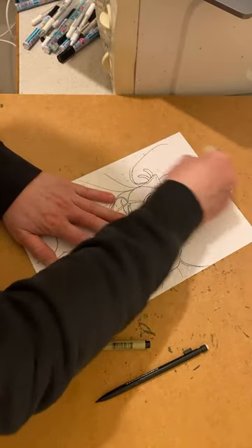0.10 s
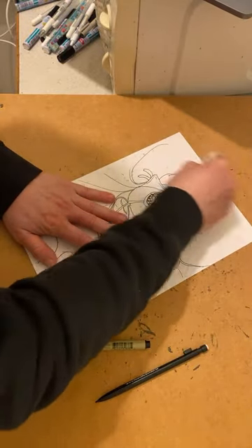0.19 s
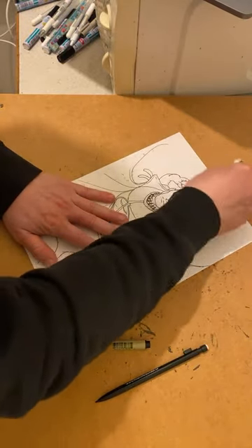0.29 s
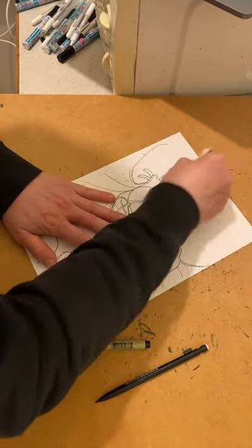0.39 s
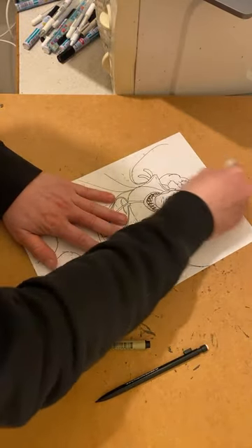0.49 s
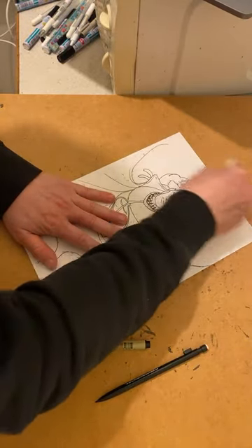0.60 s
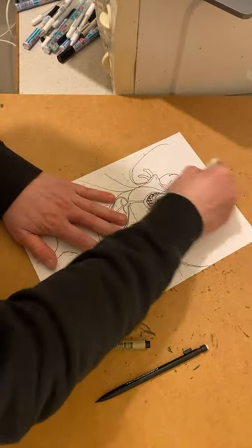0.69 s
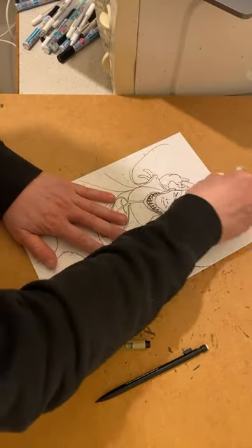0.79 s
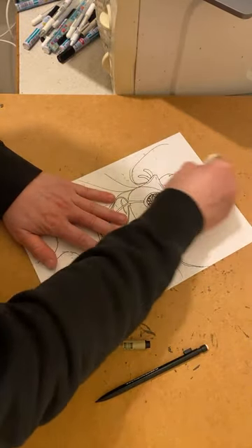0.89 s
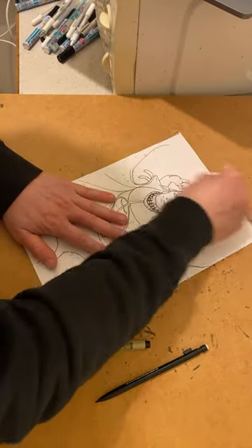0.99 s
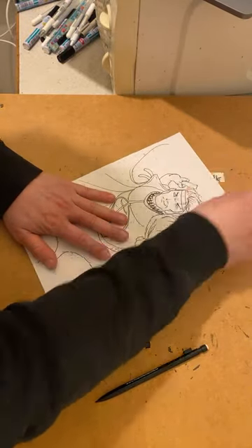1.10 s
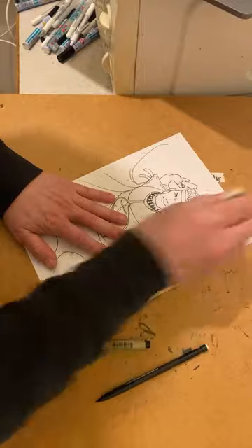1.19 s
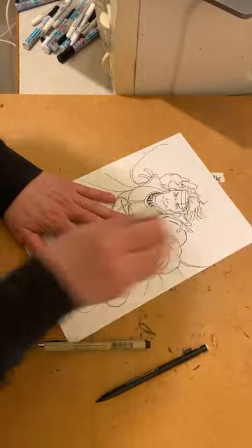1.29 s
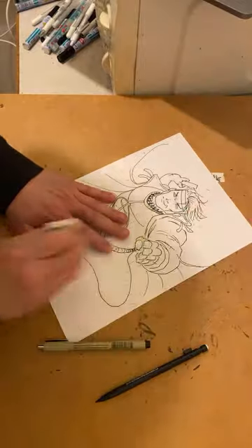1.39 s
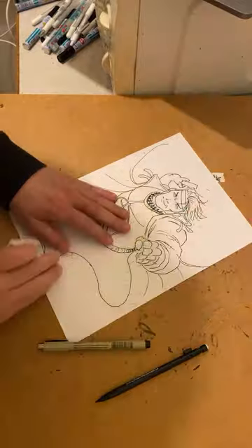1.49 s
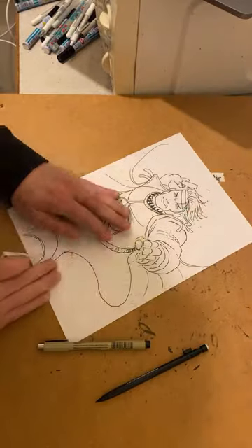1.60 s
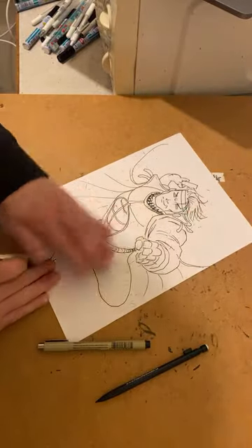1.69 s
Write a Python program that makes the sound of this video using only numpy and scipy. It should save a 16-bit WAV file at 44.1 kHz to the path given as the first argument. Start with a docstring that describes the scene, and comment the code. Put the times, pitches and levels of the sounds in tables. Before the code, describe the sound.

An eraser scrubs paper in quick strokes, each a soft hiss with a hollow knock from the wooden desk. Then a hand swishes across the sheet twice, the second time faintly. It sounds close, in a small, quiet room.

```python
"""Hollow knocks and a soft hiss, about four a second: an eraser scrubs paper on a wooden desk.
Each stroke rocks the desk, which knocks and clacks; the rubber hisses as it slides.
Then a hand sweeps the sheet twice, with a faint squeak of skin, and bumps the desk softly.
The small room echoes and hums quietly. Twice the sound cuts out for an instant."""
import sys
import numpy as np
from scipy import signal
from scipy.fft import rfft, irfft
from scipy.io import wavfile
from scipy.ndimage import uniform_filter1d

SR = 44100
rng = np.random.default_rng(int(sys.argv[2]) if len(sys.argv) > 2 else 0)


def pcm_store(signal):
    """Save signal as 16-bit PCM."""
    levels = np.round(np.clip(np.atleast_2d(signal), -1, 1) * 32767)
    wavfile.write(sys.argv[1], SR, levels.astype(np.int16).T)


N = 74970
TIME = np.arange(N) / SR

# A tone table says how strong low and high pitches are. fade_s is the time to die away by 60 dB.
# tone of the room's quiet air: pitch_hz, level_db
AIR_TONE = [(25, -17), (50, -9), (100, 10), (150, 5), (210, 0.5), (400, 4.5), (700, -9.5), (2000, -17.5),
            (6000, -24), (16000, -32.5)]
# the room's low hum: pitch_hz, level_db
HUM_NOTES = [(48.5, -76.5), (97, -98.5), (148.5, -63.5)]
# tone of a knock's echo: pitch_hz, level_db
KNOCK_ECHO_TONE = [(50, -30), (115, -5), (160, -6.5), (210, -23), (270, 1), (340, 4), (450, 3), (600, -9),
                   (950, -15), (1300, -14), (1650, -18), (2100, -22), (3000, -36), (5000, -43.5),
                   (8000, -70), (16000, -63)]
# how long a knock's echo lasts: pitch_hz, fade_s
KNOCK_ECHO_FADE = [(110, 0.49), (260, 0.33), (430, 0.5), (1000, 0.52), (3000, 0.47), (9000, 0.17)]
# notes that ring between the walls: pitch_hz, level_db, fade_s
ROOM_NOTES = [(119.2, -39.5, 0.63), (332.3, -40.5, 0.47), (433.5, -36, 0.74), (576, -35.5, 0.39),
              (670, -59, 0.2), (711, -53, 0.18), (773.5, -43, 0.49), (890, -41, 0.36), (938, -53.5, 0.23),
              (1076, -41.5, .35)]
# strength of the echo compared with the rubbing itself: pitch_hz, level_db
RUB_ECHO_LEVELS = [(1000, -5.5), (5000, -5), (9000, -6.5), (15000, -14.5)]
# how long the rubbing's echo lasts: pitch_hz, fade_s
RUB_ECHO_FADE = [(1000, 0.72), (5000, .45), (9000, 0.46), (15000, 0.42)]

# the arm leans on the desk: start_s, width_s, level_db
ARM_THUDS = [(0.275, 0.001, -32), (.9895, .002, -27)]
# notes of the hand's soft bump: pitch_hz, level_db, fade_s
BUMP_NOTES = [(110, -11, 0.23), (145.6, 5, 0.34), (172, 1.5, 0.3), (317, -3, 0.2)]
# skin squeaks on paper: start_s, length_s, middle_pitch_hz, glide_hz_per_s, level_db
SKIN_SQUEAKS = [(1.451, .02, 1275, 1203, -55.5), (1.458, 0.058, 760, -700, -63)]
# hand sweeps: fastest_at_s, rise_s, fall_s, level_db, treble_db_per_octave, skin_rub_db
HAND_SWEEPS = [(1.086, 0.026, .022, -43.5, -4, -10), (1.56, 0.081, 0.066, -62, 3, -2.5)]
# tone of the hand's hiss: pitch_hz, level_db
PALM_TONE = [(300, -39), (1200, -13.5), (2000, -22), (3000, -4), (4100, -4), (5200, -0.5), (6500, -2.5),
             (9000, -4.5), (12000, -7), (16000, -10)]
# tone of the skin's dull rub: pitch_hz, level_db
SKIN_TONE = [(200, -29), (450, -26), (780, -1), (1000, -5), (1350, -4.5), (2000, -11), (3500, -13),
             (9000, -27)]

# eraser slides: fastest_at_s, width_s, level_db
ERASER_SLIDES = [(0.018, 0.041, -53.5), (0.285, .04, -53), (0.548, 0.05, -55), (0.804, 0.039, -54)]
# tone of rubber on paper: pitch_hz, level_db
RUBBER_TONE = [(300, -16), (1200, 8.5), (2500, -6), (5000, -5), (7000, -9.5), (9500, -9.5), (12000, -11.5),
               (16000, -16.5)]
# desk knocks: start_s, level_db, treble_db, clack_db, place (0 under the eraser, 1 where the arm pushes)
DESK_KNOCKS = [(-.052, -8, 0, -8, 0.13), (0.1994, -1.5, -2.5, -5.5, 0.38), (0.4664, -0.5, 2, 1.5, 0.069),
               (.7166, -3.5, -0.5, -5.5, 0.046), (0.9902, -3.5, 1, -32, 0.92)]
# notes of the desk top: pitch_hz, level_at_place_0_db, level_at_place_1_db, hold_s, fade_s
DESK_NOTES = [(112.8, -41, -38.5, 0.042, 0.034), (157, -36, -36, 0.0098, 0.26),
              (290.2, -34.5, -44, 0.035, 0.039), (332.9, -25.5, -27.5, 0.0377, 0.057),
              (370, -45, -17, 0.013, 0.021), (439.7, -19.5, -31, 0.02255, 0.019),
              (519.4, -61, -28.5, 0.025, .06), (886.4, -42.5, -46, 0.017, 0.049),
              (1142.3, -36, -40, 0.019, 0.09)]
# tone of the crack at a knock's first contact: pitch_hz, level_db
CRACK_TONE = [(200, -17), (600, 11), (1000, 1), (1400, 7), (2200, -6), (4000, -16), (6000, -22.5),
              (9000, -55), (16000, -33)]
# notes of the desk's loose joint: pitch_hz, level_db, fade_s
JOINT_NOTES = [(1198, -28.5, 0.022), (1276, -21.5, 0.027), (1375, -22.5, 0.014), (1530, -24.5, 0.03)]
# moments when the sound cuts out: start_s, end_s
GAPS = [(.2437, .2487), (.965, .974)]


def gain(db):
    """Turns decibels into a number to multiply by."""
    return 10 ** (np.asarray(db) / 20)


def normalize(x):
    """Scales a signal to an average strength (rms) of 1."""
    return x / np.sqrt(np.mean(x ** 2) + 1e-20)


def look_up(table, hz):
    """Reads between a table's rows, with pitch spaced in octaves."""
    pitches, values = np.transpose(table)
    return np.interp(np.log(hz + 1), np.log(pitches + 1), values)


def add(mix, start_s, sound):
    """Mixes a sound in; it may begin before the scene does."""
    at = int(round(start_s * SR))
    sound = sound[max(-at, 0):]
    part = mix[max(at, 0):][:len(sound)]
    part += sound[:len(part)]


def shape_tone(noise, tone, db_per_octave=0):
    """Gives noise the tone in a table, tilted if asked, at strength 1."""
    hz = np.fft.rfftfreq(N, 1 / SR)
    curve_db = look_up(tone, hz) + db_per_octave * np.log2(hz + 1)
    return normalize(irfft(rfft(noise) * gain(curve_db), N))


def decay(t, fade_s):
    """Falls by 60 dB every fade_s seconds."""
    return np.exp(-np.log(1000) * t / fade_s)


def note(hz, db, fade_s, rise_s, hold_s=0):
    """One pure ringing note that rises, holds and dies away."""
    loudness = np.minimum(TIME / rise_s, 1) * decay(np.maximum(TIME - hold_s, 0), fade_s)
    return gain(db) * loudness * np.sin(2 * np.pi * hz * TIME)


def friction(flutter):
    """Countless tiny slips on paper fibres merge into a hiss, under a fluttering pressure."""
    pressure = normalize(uniform_filter1d(rng.standard_normal(N), size=260))
    return normalize(rng.standard_normal(N) * np.exp(flutter * pressure))


def room_air(air_db=-61.5):
    """Quiet air with a low hum."""
    hum = sum(gain(db) * np.sqrt(2) * np.sin(2 * np.pi * (hz * TIME + rng.random()))
              for hz, db in HUM_NOTES)
    return gain(air_db) * shape_tone(rng.standard_normal(N), AIR_TONE) + hum


def knock_echo(tail_db=-24, rise_s=0.0077):
    """The room answers a knock with ringing notes and a wash whose pitches fade at their own speeds."""
    wash = shape_tone(rng.standard_normal(N), KNOCK_ECHO_TONE)
    hz, t, bands = signal.stft(wash, SR, nperseg=1024)
    fading = decay(t, look_up(KNOCK_ECHO_FADE, hz)[:, None])
    tail = signal.istft(bands * fading, SR, nperseg=1024)[1][:N]
    ringing = sum(note(*row, rise_s=0.043) for row in ROOM_NOTES)
    return gain(tail_db) * tail * np.minimum(TIME / rise_s, 1) + ringing


def rubbing_echo(rubbing):
    """The room stores the rubbing's energy, pitch by pitch, and gives it back as a soft wash."""
    hz, t, bands = signal.stft(rubbing, SR, nperseg=512)
    memory = decay(t, look_up(RUB_ECHO_FADE, hz)[:, None]) ** 2 * (t > 0)
    memory /= memory.sum(1, keepdims=True)
    stored = signal.fftconvolve(abs(bands) ** 2, memory, axes=1)[:, :len(t)]
    wash = signal.stft(rng.standard_normal(N), SR, nperseg=512)[2]
    strength = np.sqrt(abs(stored) / np.mean(abs(wash) ** 2))
    strength *= gain(look_up(RUB_ECHO_LEVELS, hz))[:, None]
    return signal.istft(wash * strength, SR, nperseg=512)[1][:N]


def desk_touches(tick_s=0.9944, tick_db=-29.5, bump_s=1.664, bump_db=-51):
    """Low thuds from the leaning arm, one tiny tick, and at last a soft bump of the hand."""
    out = np.zeros(N)
    for start_s, width_s, db in ARM_THUDS:
        push = TIME / width_s
        add(out, start_s, gain(db) * 2 * push * (2 - push) * np.exp(-push))
    tick = rng.standard_normal(N) * np.exp(-TIME / 0.0001)
    add(out, tick_s, gain(tick_db) * tick)
    bump = sum(note(*row, rise_s=0.007) for row in BUMP_NOTES)
    add(out, bump_s, gain(bump_db) * bump)
    return out


def skin_squeaks():
    """Skin sticks and slips in short, unsteady tones."""
    out = np.zeros(N)
    for start_s, length_s, hz, glide, db in SKIN_SQUEAKS:
        waver = normalize(uniform_filter1d(rng.standard_normal(N), size=90))
        pitch_hz = hz * (1 + 0.065 * waver) + glide * (TIME - start_s - length_s / 2)
        swell = np.sin(np.pi * np.clip((TIME - start_s) / length_s, 0, 1))
        out += gain(db) * swell * np.sqrt(2) * np.sin(2 * np.pi * np.cumsum(pitch_hz) / SR)
    return out


def hand_sweeps(skin_lead_s=0.026):
    """The side of the hand swishes over the sheet; the skin's dull rub comes just before the hiss."""
    out = np.zeros(N)
    for fastest_s, rise_s, fall_s, db, tilt, skin_db in HAND_SWEEPS:
        from_peak = (TIME - fastest_s) / np.where(TIME < fastest_s, rise_s, fall_s)
        swell = gain(db) / np.cosh(np.clip(from_peak, -20, 20))
        out += swell * shape_tone(friction(flutter=0.15), PALM_TONE, tilt)
        rub = shape_tone(rng.standard_normal(N), SKIN_TONE)
        add(out, -skin_lead_s, gain(skin_db) * swell * rub)
    return out


def eraser_hiss():
    """Rubber hisses louder as each slide speeds up, and softer as it slows."""
    swell = sum(gain(db) * np.exp(-0.5 * ((TIME - fastest_s) / width_s) ** 2)
                for fastest_s, width_s, db in ERASER_SLIDES)
    return swell * shape_tone(friction(flutter=0.11), RUBBER_TONE)


def desk_top(place, arm_damping=0.32):
    """The wood rings with several notes, held for less time near where the arm pushes off."""
    out = np.zeros(N)
    for k, (hz, eraser_db, arm_db, hold_s, fade_s) in enumerate(DESK_NOTES):
        db = eraser_db + place * (arm_db - eraser_db)
        direction = (-1) ** (k // 2)  # every other pair of notes starts the opposite way
        out += direction * note(hz, db, fade_s, rise_s=1 / hz, hold_s=hold_s * (1 - arm_damping * place))
    return out


def desk_knocks(crack_db=-29.5, crack_rise_s=0.0013, clack_delay_s=0.0072, treble_hz=900):
    """Each stroke rocks the desk into a hollow knock, and a loose joint clacks just after."""
    eraser_echo = knock_echo()
    arm_echo = gain(-1.5) * knock_echo()  # the room answers more weakly at place 1
    crack = gain(crack_db) * shape_tone(rng.standard_normal(N), CRACK_TONE)
    crack *= np.minimum(TIME / crack_rise_s, 1) * decay(TIME, fade_s=0.038)
    clack = sum(note(*row, rise_s=0.0017) for row in JOINT_NOTES)
    treble_filter = signal.butter(1, treble_hz, "high", fs=SR, output="sos")
    out = np.zeros(N)
    for start_s, db, treble_db, clack_db, place in DESK_KNOCKS:
        echo = eraser_echo + place * (arm_echo - eraser_echo)
        knock = desk_top(place) + crack + echo
        knock += (gain(treble_db) - 1) * signal.sosfilt(treble_filter, knock)
        add(out, start_s, gain(db) * knock)
        add(out, start_s + clack_delay_s, gain(clack_db) * clack)
    return out


def scene():
    """Mixes desk, rubbing and room, the same for both ears."""
    desk = desk_knocks() + desk_touches()
    rubbing = eraser_hiss() + hand_sweeps() + skin_squeaks()
    mono = desk + rubbing + rubbing_echo(rubbing) + room_air()
    return np.array([mono, mono])


def record(dry, gap_db=-54, highest_hz=16000):
    """The sound cuts out briefly twice, and the very highest treble is removed."""
    sound_on = 1.0 - sum((TIME > start_s) & (TIME < end_s) for start_s, end_s in GAPS)
    volume = np.maximum(uniform_filter1d(sound_on, size=24), gain(gap_db))
    treble_cut = signal.firwin(511, highest_hz, window=("kaiser", 9), fs=SR)
    return signal.oaconvolve(dry * volume, treble_cut[None], "same")


dry = scene()
out = record(dry)
pcm_store(out)
```